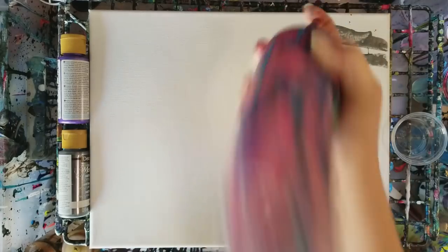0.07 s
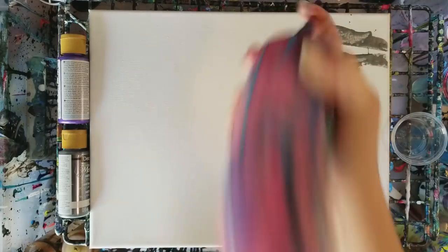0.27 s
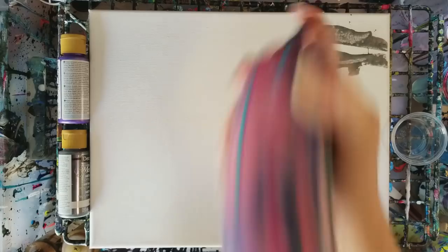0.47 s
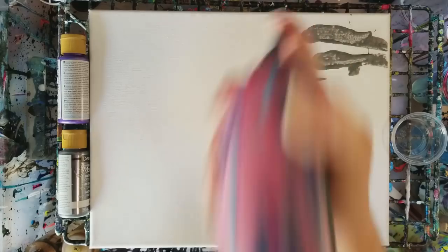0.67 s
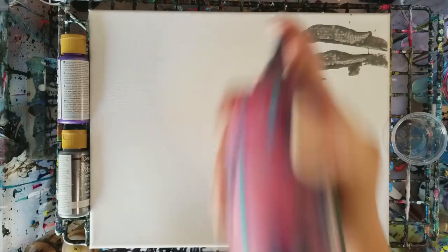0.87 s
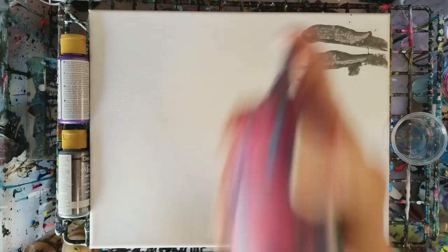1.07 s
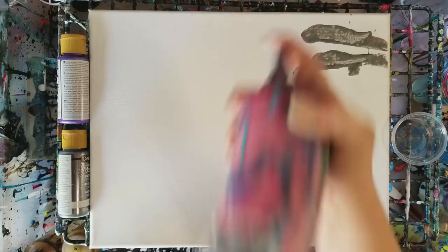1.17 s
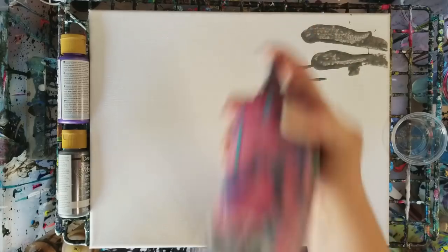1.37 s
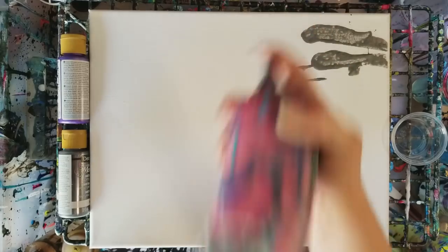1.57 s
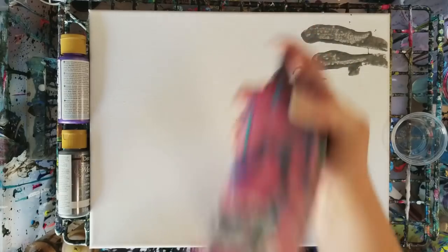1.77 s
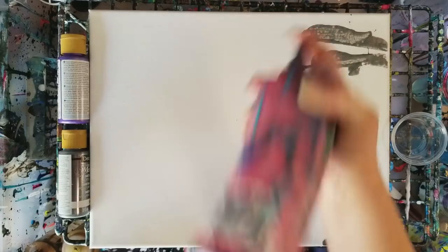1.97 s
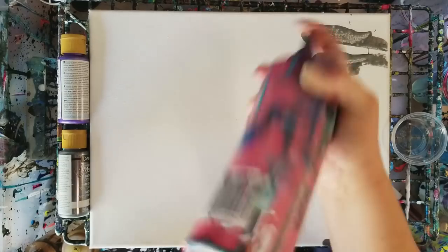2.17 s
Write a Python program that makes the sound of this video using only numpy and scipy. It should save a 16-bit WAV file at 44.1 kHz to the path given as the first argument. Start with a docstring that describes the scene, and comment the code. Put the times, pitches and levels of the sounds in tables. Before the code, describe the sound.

Thin paint sloshes in a plastic bottle shaken hard by hand. Quick, uneven wet slaps and light knocks mix with low gulps and popping bubbles, easing briefly midway, close to the microphones in a quiet room.

```python
"""In a quiet room, a plastic bottle of thin paint is shaken hard, close to two microphones.
At each turn of the hand the paint slaps the wall: a short ring, a splash of tiny bubbles and
a thump of the bottle. Pockets of air gulp low and larger bubbles pop with a rough, high tone.
The table and walls add a short echo, over a faint hiss and a low drone."""
import sys
import numpy as np
from scipy import signal
from scipy.fft import rfft, irfft
from scipy.io import wavfile

SR = 44100
rng = np.random.default_rng(int(sys.argv[2]) if len(sys.argv) > 2 else 0)


def log_audio(samples):
    """Write samples as a 16-bit WAV file to the path given in sys.argv[1]."""
    # one column per channel
    frames = np.atleast_2d(samples).T
    # limit to full scale, then quantise
    limited = np.clip(frames, -1, 1)
    pcm = np.round(limited * 32767).astype(np.int16)
    wavfile.write(sys.argv[1], SR, pcm)


N = 97328


def amp(db):
    return 10 ** (np.asarray(db) / 20)


def unit_level(x):
    return x / np.sqrt(np.mean(x ** 2) + 1e-20)


def curve(points, samples):
    """Reads a (frequency, value) table at every frequency of a sound this many samples long."""
    hz, value = np.transpose(points)
    return np.interp(np.log(np.fft.rfftfreq(samples, 1 / SR) + 1), np.log(hz + 1), value)


def coloured(x, points):
    """Makes some frequencies louder than others, then sets the average level to 1."""
    samples = x.shape[-1]
    return unit_level(irfft(rfft(x) * amp(curve(points, samples)), samples))


def stereo(a, b):
    """Blends two sounds into a left and a right side that are most alike in the bass."""
    # how alike the two sides are: (frequency [Hz], likeness [0 to 1])
    likeness = [(45, 0.98), (70, 0.85), (290, 0.96), (1400, 0.76), (5000, 0.61), (15000, 0.7)]
    same = np.clip(curve(likeness, len(a)), 0, 1)
    right = irfft(same * rfft(a) + np.sqrt(1 - same ** 2) * rfft(b), len(a))
    return np.array([a, right])


def resonate(x, hz, width_hz):
    """Makes a sound ring around one pitch, at an average level of 1."""
    r = np.exp(-np.pi * width_hz / SR)
    return unit_level(signal.lfilter([1, 0, -1], [1, -2 * r * np.cos(2 * np.pi * hz / SR), r * r], x))


def add(mix, start, sound, place):
    """Adds a sound; the bottle's place (delay, side) shifts its timing and level between microphones."""
    delay, side = place
    left_lag = round(SR * (.00009 + .00006 * delay))
    sound = np.broadcast_to(sound, (2, sound.shape[-1]))
    for channel, at in enumerate([round(start * SR) + left_lag, round(start * SR)]):
        part = mix[channel, max(at, 0):][:sound.shape[1]]
        part += sound[channel, :len(part)] * amp(side * (0.5 - channel))


def tiny_bubbles(sizes=36, per_second=12000, spread_db=3.3, fade_cycles=9.0):
    """A dense stream of tiny bubbles; each rings for a few dying cycles at the pitch of its size."""
    out, t = np.zeros(N), np.arange(1500) / SR
    strength = amp(spread_db * np.minimum(rng.exponential(1, N), 5))
    strength *= rng.random(N) < per_second / SR
    size = rng.integers(0, sizes, N)
    for k, hz in enumerate(np.geomspace(300, 16000, sizes)):
        cycles = hz * t
        ping = np.sin(2 * np.pi * cycles) * cycles * np.exp(-3 * cycles / fade_cycles) * (cycles < 30)
        starts = strength ** (1 + 0.18 * k / sizes) * (size == k)  # the smallest vary most in level
        out += signal.oaconvolve(starts, ping / np.linalg.norm(ping) * np.sqrt(hz))[:N]
    return out


def wall_hit(t, hz, ring_s=.0024, smack_s=0.000081):
    """Paint hits the wall: a sharp smack and a short ring with one overtone."""
    cycles, u = hz * t, t / smack_s
    overtone = amp(-6) * np.sin(2 * np.pi * 1.9 * cycles) * np.exp(-hz / 1500)
    shape = (1 - np.exp(-(cycles / 1.1) ** 2)) * np.exp(-t / ring_s)
    ring = shape * (np.sin(2 * np.pi * cycles) + overtone)
    smack = u * u * (3 - u) * np.exp(-u)
    return ring / abs(ring).max() + amp(-11) * smack


def slaps(spray_lead_s=0.002, rise_s=0.0025, crack_s=0.0012):
    """Each slap hits the wall, thumps the bottle and throws bubbles: a splash and a brighter fizz."""
    # slaps of paint on the wall; a fade time is how long a sound takes to drop by 60 dB:
    # (time [s], ring level [dB], ring pitch [Hz], fizz level [dB], splash level [dB], fade time [s])
    hits = [(0.0, -25, 890, -34.5, -64, 0.032), (0.007, -22.5, 1100, -39.5, -25.5, 0.079),
            (0.024, -21.5, 668, -60, -41, 0.11), (0.076, -24.5, 1043, -35, -29, 0.16),
            (0.096, -24, 1700, -60, -30.5, 0.074), (0.116, -29, 1260, -61, -35.5, 0.11),
            (0.16, -31, 704, -48, -44, 0.15), (0.175, -30.5, 870, -47, -26, 0.078),
            (0.2015, -14.5, 910, -58, -23.5, 0.086), (0.232, -26, 620, -66, -38.5, 0.13),
            (0.269, -18.5, 1150, -29, -21, 0.052), (0.276, -16, 2050, -36, -21, 0.14),
            (0.286, -20.5, 2065, -41, -46, 0.17), (0.349, -42, 610, -44, -36, 0.051),
            (0.366, -10, 1626, -38.5, -20, 0.096), (0.38, -19, 1344, -75, -60, 0.061),
            (0.463, -25.5, 2380, -50, -32, 0.17), (0.473, -24, 826, -47, -37.5, 0.1),
            (0.4802, -8.5, 1720, -36, -24, 0.086), (0.532, -33, 622, -48.5, -41, 0.15),
            (0.556, -34, 1290, -44.5, -26, 0.067), (0.574, -13.5, 977, -31.5, -21.5, 0.072),
            (0.629, -34.5, 1080, -46.5, -33.5, 0.037), (0.651, -19, 1065, -43, -24, 0.04),
            (0.661, -52, 760, -34.5, -29.5, 0.1), (0.672, -20, 1010, -32, -24, 0.094),
            (0.743, -23.5, 1505, -43.5, -27, 0.071), (0.762, -24.5, 1690, -52, -29, 0.07),
            (0.766, -23, 657, -63, -42, 0.06), (0.809, -34, 1310, -72, -39.5, 0.11),
            (0.846, -21, 1190, -61, -25, 0.11), (0.874, -22.5, 1490, -34, -26, 0.09),
            (0.911, -28.5, 681, -69, -66, 0.13), (0.923, -29, 720, -65, -45, 0.071),
            (0.941, -27, 840, -51, -43, 0.13), (0.96, -28, 1370, -47, -30, 0.12),
            (1.042, -22, 1670, -40.5, -34, 0.11), (1.057, -25.5, 1300, -42, -32, 0.08),
            (1.074, -28, 1910, -46, -37, 0.097), (1.12, -39.5, 750, -48.5, -57, 0.12),
            (1.158, -40.5, 640, -53, -43, 0.15), (1.225, -41.5, 1540, -78, -48, 0.1),
            (1.242, -44, 2620, -57.5, -53, 0.52), (1.305, -40, 616, -55, -43, 0.16),
            (1.343, -29, 650, -49, -38, 0.048), (1.352, -16, 779, -50, -36, 0.06),
            (1.36, -36, 1600, -40, -24.5, 0.07), (1.449, -12.5, 1600, -34, -21, 0.072),
            (1.464, -19, 1550, -38, -32.5, 0.19), (1.519, -38, 724, -42.5, -35, 0.083),
            (1.5458, -13.5, 978, -33.5, -21, 0.064), (1.589, -33.5, 770, -53.5, -37, 0.12),
            (1.639, -22, 1860, -33, -25, 0.17), (1.645, -17, 2060, -45, -31.5, 0.069),
            (1.733, -13.5, 1190, -51, -17.5, 0.051), (1.7345, -16, 700, -37, -41, 0.13),
            (1.759, -36, 1900, -56, -31.5, 0.15), (1.829, -24.5, 706, -40.5, -35, 0.055),
            (1.839, -23.5, 3310, -33, -28.5, 0.041), (1.852, -20.5, 713, -39.5, -23, 0.091),
            (1.913, -23, 1925, -80, -40, 0.35), (1.937, -24.5, 1560, -48, -28, 0.13),
            (1.972, -25, 1370, -69, -30, 0.078), (2.008, -30.5, 1660, -53, -56, 1),
            (2.048, -23.5, 1040, -29.5, -23.5, 0.067), (2.065, -28.5, 895, -44, -37, 0.15),
            (2.123, -21, 930, -32, -22, 0.06), (2.15, -30, 1320, -43.5, -31.5, 0.06),
            (2.165, -28.5, 990, -59, -48, 0.42)]
    # tone colour of the splash: (frequency [Hz], level [dB])
    splash_colour = [(150, -29), (250, -3), (896, -5), (1370, -1.5), (1790, -4), (2130, -4.5), (2330, -6.5),
                     (6000, -35), (7800, -69), (13200, -120)]
    # tone colour of the fizz: (frequency [Hz], level [dB])
    fizz_colour = [(2060, -9.5), (3500, -2.5), (5940, -8.5), (7490, -7), (9260, -17), (13500, -20.5),
                   (16300, -29)]
    # the bottle's own low notes: (pitch [Hz], level [dB], fade time [s])
    bottle_notes = [(188.7, -8, 0.11), (380, -25.5, 0.27)]
    out, t = np.zeros((2, N)), np.arange(9000) / SR
    stream = np.tile(stereo(tiny_bubbles(), tiny_bubbles()), 2)
    splash_stream, fizz_stream = coloured(stream, splash_colour), coloured(stream, fizz_colour)
    thump = sum(amp(db - 60 * t / fade_s) * np.sin(2 * np.pi * hz * t) for hz, db, fade_s in bottle_notes)
    since_hit = np.maximum(t - spray_lead_s, 0)  # spray arrives before the blow
    rise = (1 - np.exp(-t / rise_s)) ** 2
    crack = 1 + amp(4) * np.exp(-abs(t - spray_lead_s - .001) / crack_s)  # the fizz opens sharply
    for start, ring_db, hz, fizz_db, splash_db, fade_s in hits:
        span = slice(round(start * SR), round(start * SR) + len(t))
        fade = amp(-60 * t / fade_s)
        splash = fade * splash_stream[:, span]
        splash *= np.sqrt(2) * np.linalg.norm(fade) / np.linalg.norm(splash)  # evens out chance
        fizz = amp(fizz_db - 60 * t / (0.83 * fade_s)) * fizz_stream[:, span] * crack
        slap = rise * (amp(splash_db) * (splash + thump) + fizz) + amp(ring_db) * wall_hit(since_hit, hz)
        add(out, start - .001 - spray_lead_s, slap, rng.standard_normal(2))
    return out


def room_tone(hiss_db=-49):
    """Quiet room hiss with a low, wavering drone."""
    # tone colour of the hiss: (frequency [Hz], level [dB])
    hiss_colour = [(59, -49), (100, 7), (190, 11), (742, -9), (918, -3.5), (1440, -30), (2610, -19),
                   (3520, -23), (16300, -38)]
    # bands of noise in the drone: (pitch [Hz], level [dB], width [Hz])
    drone_bands = [(35, -6.5, 33), (60, 1.5, 5.4), (87, -0.5, 26)]
    # how the drone swells and sinks: (time [s], level [dB])
    drone_levels = [(0.0, -44), (0.16, -63), (0.26, -52.5), (1.13, -58), (1.21, -52), (1.91, -50.5),
                    (2.06, -45.5), (2.2, -49)]
    noise, drone = stereo(*rng.standard_normal((2, N))), np.zeros((2, N))
    for hz, db, width in drone_bands:
        drone += amp(db) * np.array([resonate(resonate(side, hz, width), hz, 1.6 * width) for side in noise])
    level = amp(np.interp(np.arange(N) / SR, *np.transpose(drone_levels)))
    return amp(hiss_db) * coloured(noise, hiss_colour) + level * unit_level(drone)


def echoes(x, level_db=-20.5, fade_s=0.25):
    """Sound bounces off the table and walls: scattered dying copies, different on each side."""
    t = np.arange(12000) / SR
    bounces = rng.choice([-1., 1.], (2, len(t))) * (rng.random((2, len(t))) < .05)
    bounces *= (t > .002) * amp(-60 * t / fade_s)
    bounces = signal.lfilter([1], [1, -.5], bounces)  # softens the treble
    return amp(level_db) * signal.fftconvolve(x, bounces / np.linalg.norm(bounces[0]), axes=1)[:, :N]


def gulps(glide=0.18):
    """An air pocket swells and closes: a few low cycles that glide up in pitch."""
    # gulps of trapped air: (time [s], level [dB], pitch [Hz], length [s])
    air_pockets = [(0.004, -27, 360, 0.022), (0.089, -34.5, 295, 0.036), (0.117, -21.5, 417, 0.014),
                   (0.163, -27, 315, 0.011), (0.181, -23, 453, 0.019), (0.272, -35, 518, 0.027),
                   (0.28, -19, 329, 0.027), (0.533, -25.5, 400, 0.0089), (0.542, -20.5, 336, 0.013),
                   (0.659, -19, 372, 0.018), (0.738, -42, 266, 0.014), (0.81, -34, 1350, 0.014),
                   (0.841, -24.5, 357, 0.021), (0.874, -27.5, 379, 0.024), (0.945, -24.5, 407, 0.006),
                   (0.957, -30.5, 370, 0.014), (1.168, -31.5, 234, 0.01), (1.308, -32, 343, 0.018),
                   (1.316, -37.5, 280, 0.053), (1.34, -22, 336, 0.012), (1.349, -15.5, 412, 0.0086),
                   (1.356, -18.5, 380, 0.013), (1.449, -23.5, 418, 0.0123), (1.508, -24.5, 404, 0.017),
                   (1.639, -36, 368, 0.014), (1.733, -22, 380, 0.015), (1.836, -37, 530, 0.015),
                   (1.932, -34, 287, 0.021), (1.966, -23, 346, 0.014), (1.971, -23.5, 350, 0.037),
                   (2.009, -29, 286, 0.012), (2.047, -25, 437, 0.02), (2.119, -27, 340, 0.0079)]
    out = np.zeros((2, N))
    for start, db, hz, length in air_pockets:
        place = rng.standard_normal(2)
        progress = np.arange(0, length, 1 / SR) / length
        phase = 2 * np.pi * hz * length * (progress + glide * (progress ** 2 - progress))
        tone = np.sin(phase) + amp(-12) * np.sin(1.856 * phase + 2 * place[0])
        swell = np.sin(np.pi * progress ** 0.52) ** 2
        add(out, start, amp(db) * swell * tone, place)
    return out


def pops(rise_s=0.0032, fade_s=.045, width_hz=650):
    """A larger bubble bursts: a soft start and a short, rough, high tone."""
    # bursting bubbles: (time [s], level [dB], pitch [Hz])
    bursts = [(0.1102, -31.5, 4200), (0.4811, -18, 2420), (0.5844, -30, 3380), (0.6619, -32, 3360),
              (0.766, -24.5, 3240), (0.773, -28, 2900), (0.8514, -15.5, 2630), (0.941, -39, 5500),
              (1.0635, -45, 3900), (1.1524, -41, 2630), (1.255, -36.5, 2620), (1.291, -43, 2740),
              (1.371, -40, 2810), (1.3922, -36, 3230), (1.448, -13, 2150), (1.4614, -29, 3020),
              (1.7554, -25, 2340), (1.7704, -33.5, 2460), (1.8386, -23, 3370), (2.1201, -26, 2900),
              (2.131, -28, 2260)]
    out, t = np.zeros((2, N)), np.arange(3000) / SR
    shape = amp(-60 * t / fade_s) * (1 - np.exp(-t / rise_s))
    for start, db, hz in bursts:
        noise = rng.standard_normal(len(t))
        pop = shape * resonate(resonate(noise, hz, width_hz), hz, 2 * width_hz)
        add(out, start, amp(db) * pop / abs(pop).max(), rng.standard_normal(2))
    return out


def scene():
    """The bottle, its echoes and the room."""
    bottle = slaps() + gulps() + pops()
    return bottle + echoes(bottle) + room_tone()


def record(dry, lowest_hz=22, highest_hz=16250):
    """The microphones lose the deepest bass and highest treble, and differ a little in tone."""
    # how much louder the left microphone is than the right: (frequency [Hz], level [dB])
    left_over_right = [(30, 2.5), (120, 0), (4000, 0.9), (8000, 0.5), (14000, -0.5)]
    sound = signal.sosfilt(signal.butter(2, lowest_hz, "high", fs=SR, output="sos"), dry)
    balance_db = curve(left_over_right, N) * np.array([[.5], [-.5]])
    sound = irfft(rfft(sound) * amp(balance_db), N)
    treble_cut = signal.firwin(511, highest_hz, window=("kaiser", 9), fs=SR)
    return signal.oaconvolve(sound, treble_cut[None], "same")


dry = scene()
out = record(dry)
log_audio(out)
```